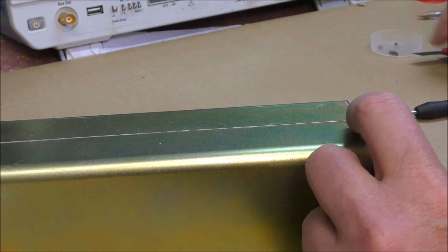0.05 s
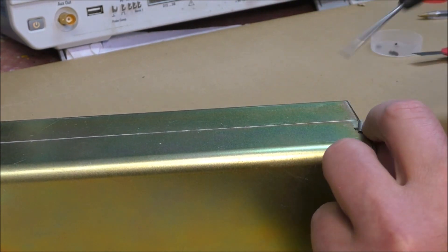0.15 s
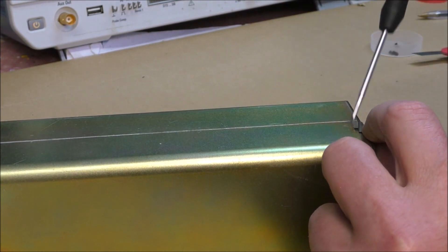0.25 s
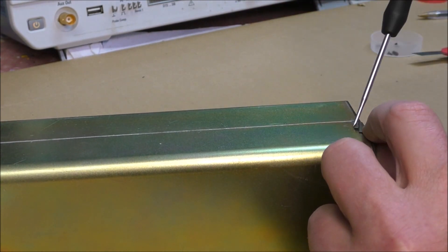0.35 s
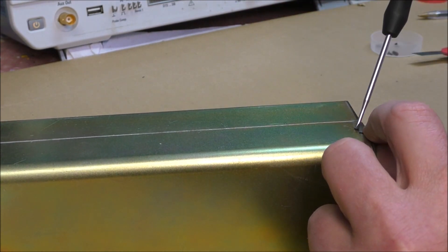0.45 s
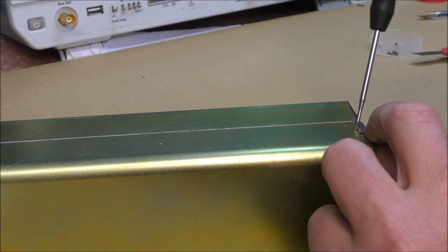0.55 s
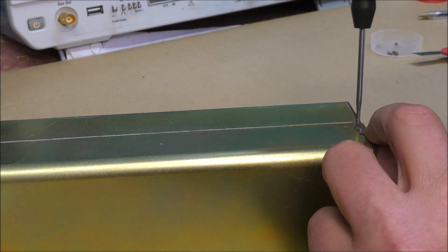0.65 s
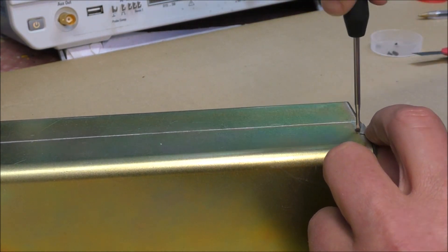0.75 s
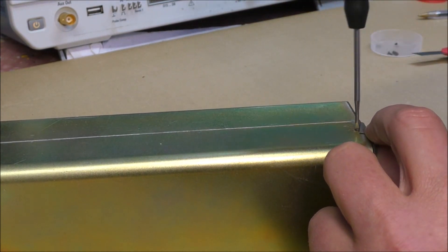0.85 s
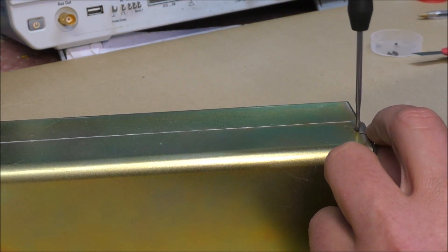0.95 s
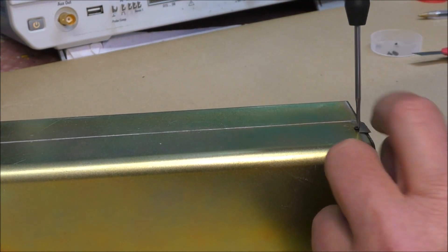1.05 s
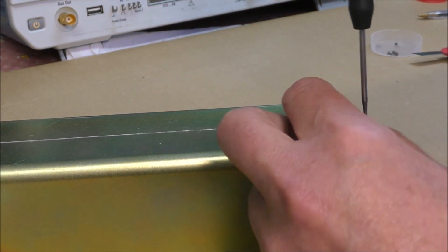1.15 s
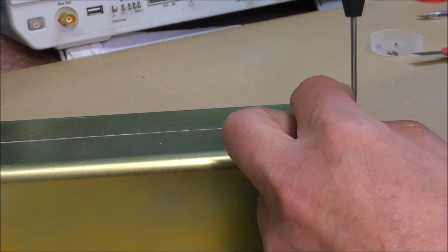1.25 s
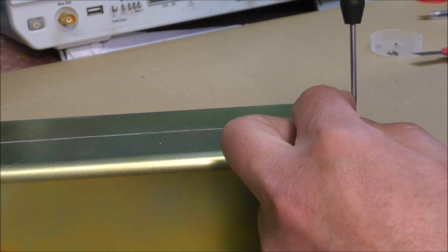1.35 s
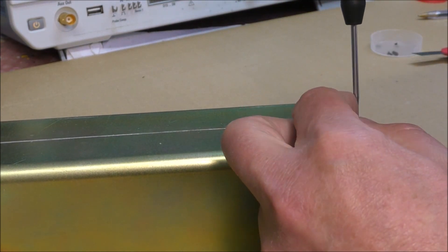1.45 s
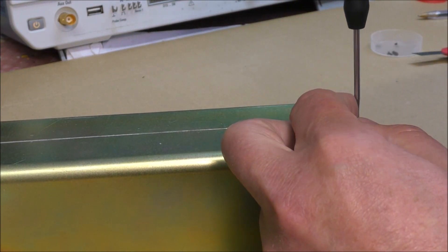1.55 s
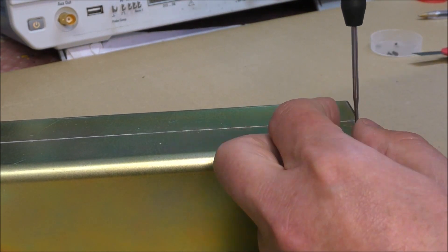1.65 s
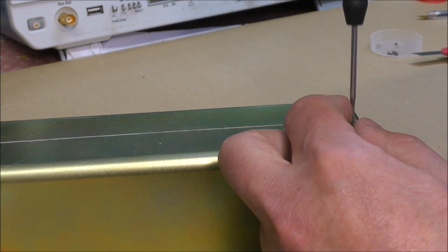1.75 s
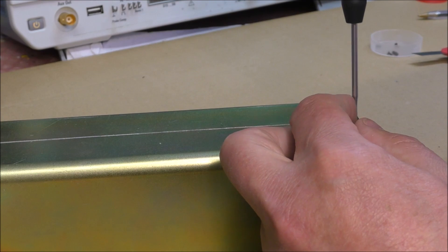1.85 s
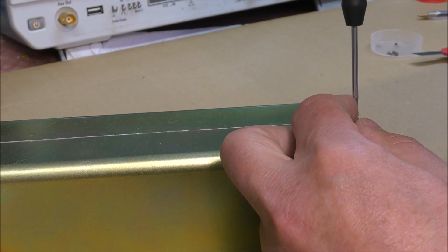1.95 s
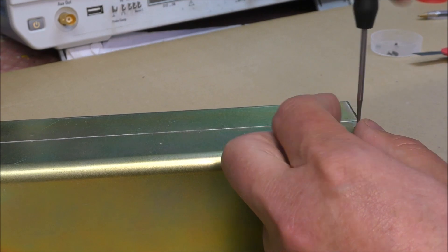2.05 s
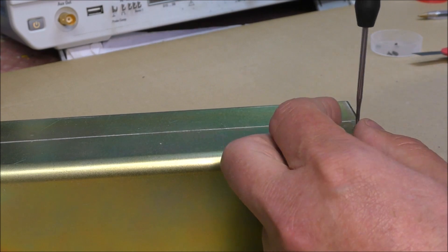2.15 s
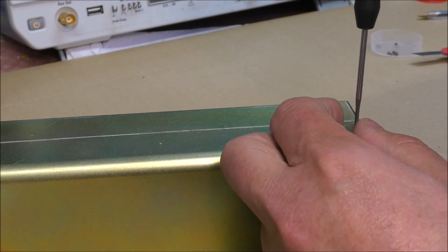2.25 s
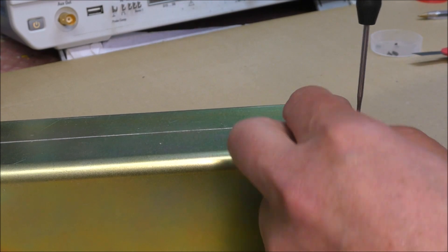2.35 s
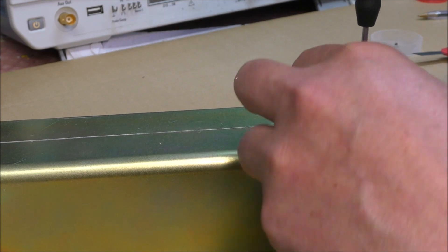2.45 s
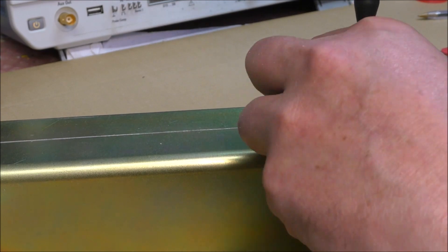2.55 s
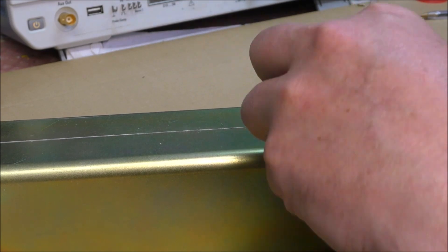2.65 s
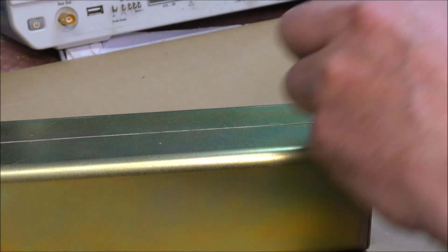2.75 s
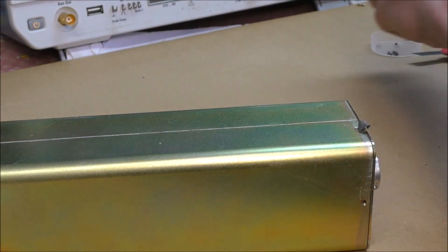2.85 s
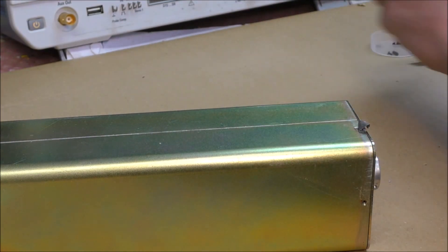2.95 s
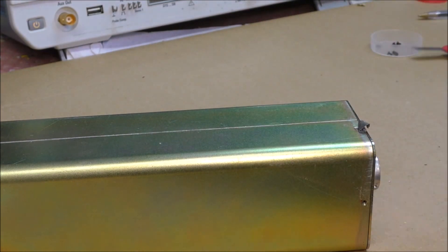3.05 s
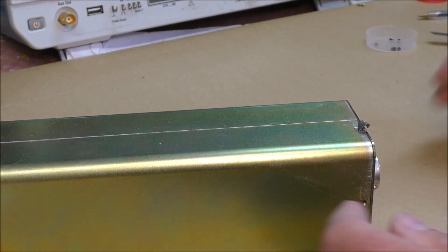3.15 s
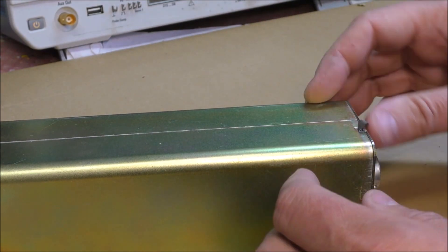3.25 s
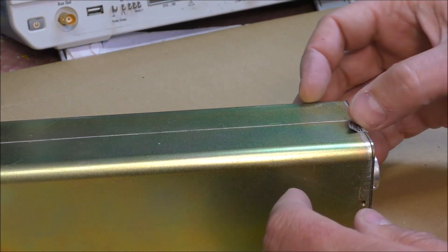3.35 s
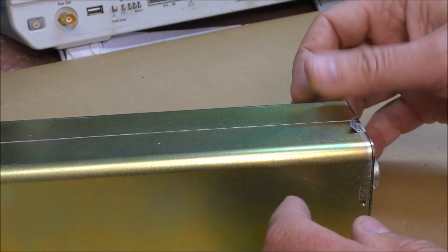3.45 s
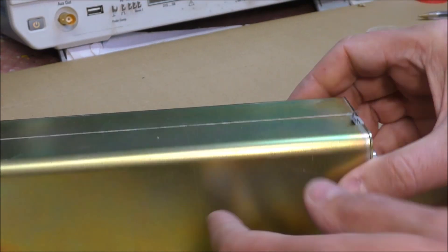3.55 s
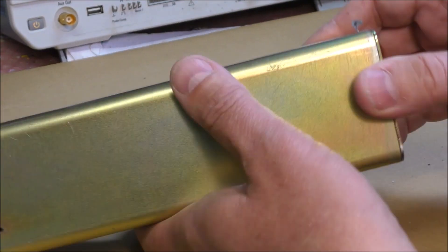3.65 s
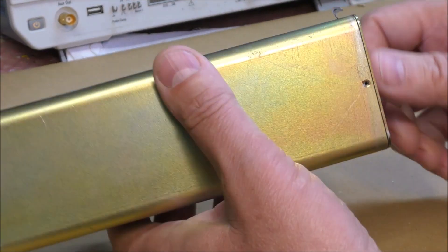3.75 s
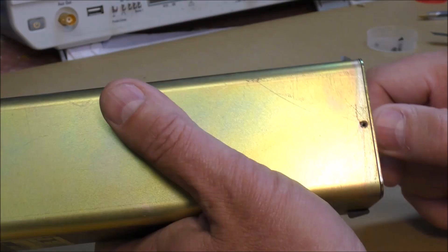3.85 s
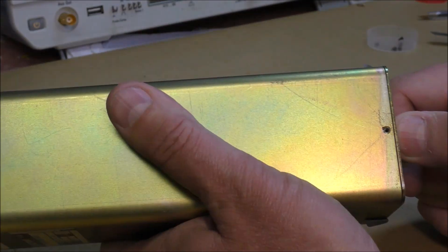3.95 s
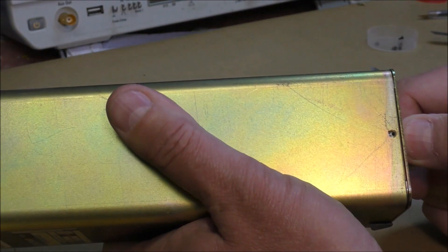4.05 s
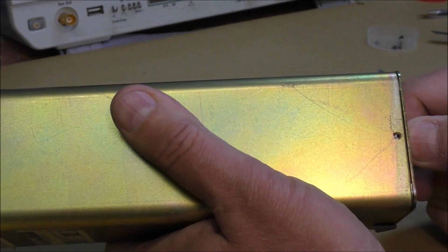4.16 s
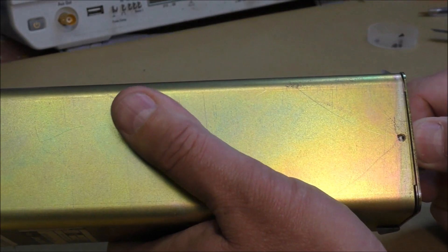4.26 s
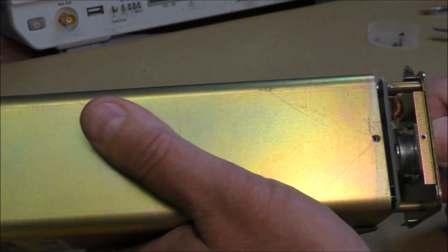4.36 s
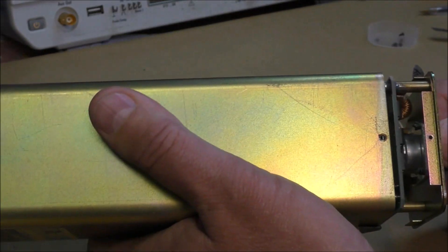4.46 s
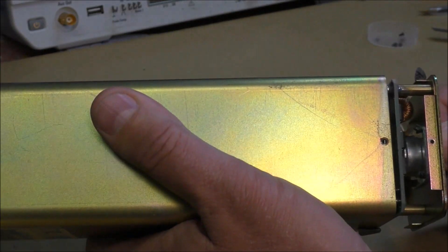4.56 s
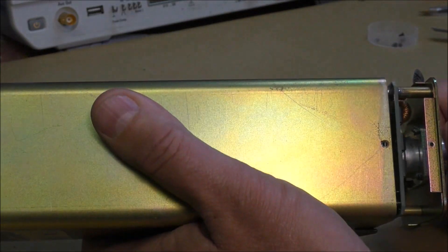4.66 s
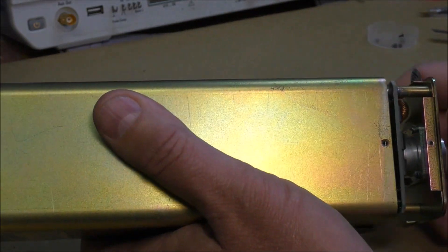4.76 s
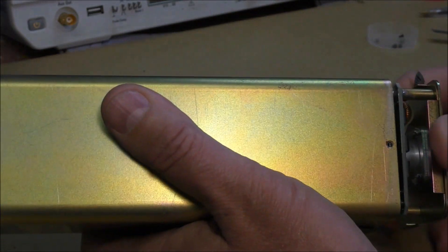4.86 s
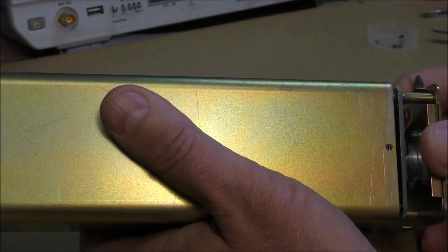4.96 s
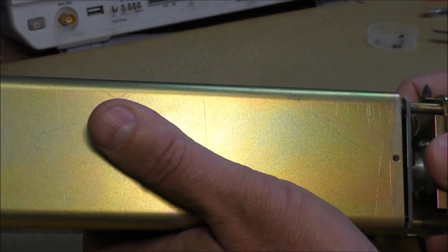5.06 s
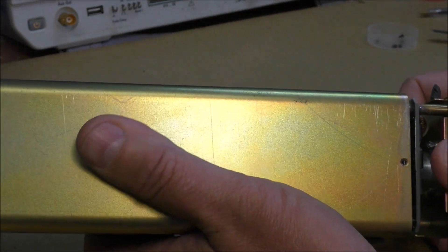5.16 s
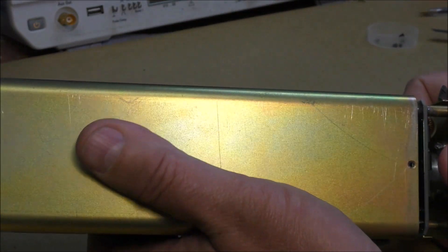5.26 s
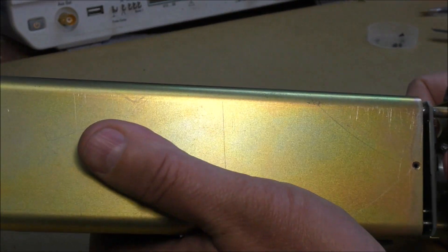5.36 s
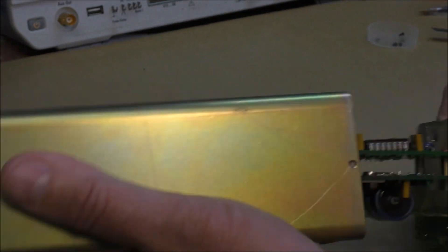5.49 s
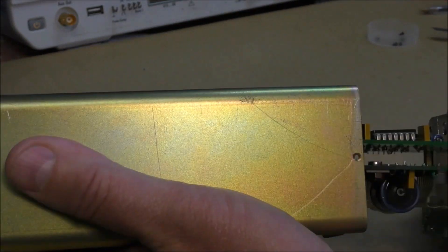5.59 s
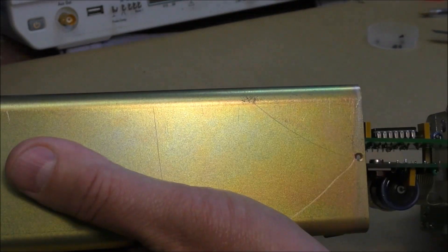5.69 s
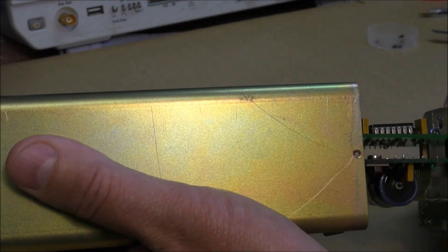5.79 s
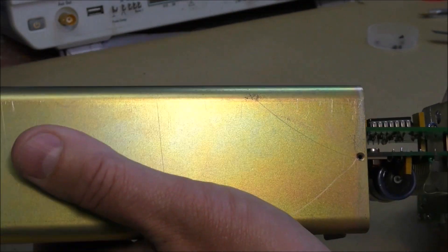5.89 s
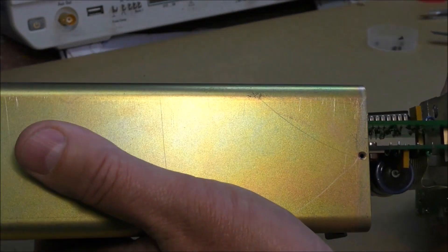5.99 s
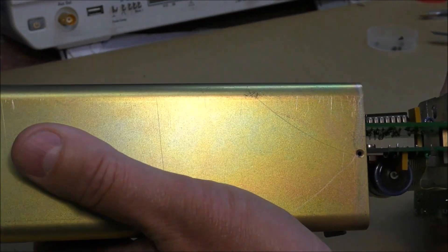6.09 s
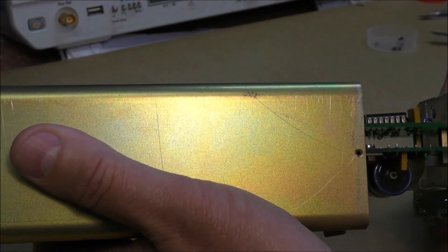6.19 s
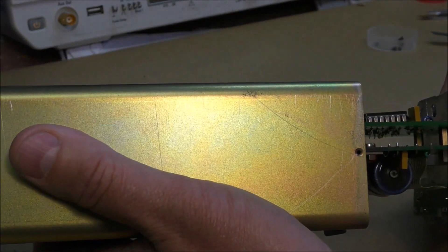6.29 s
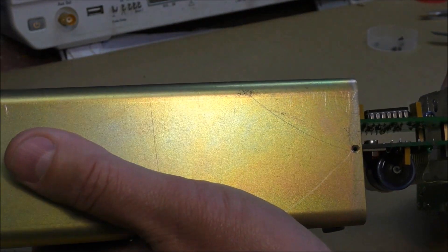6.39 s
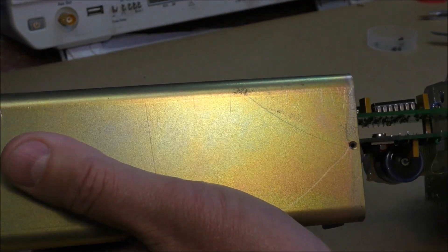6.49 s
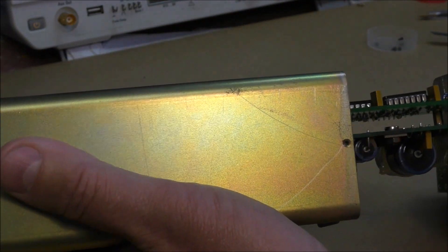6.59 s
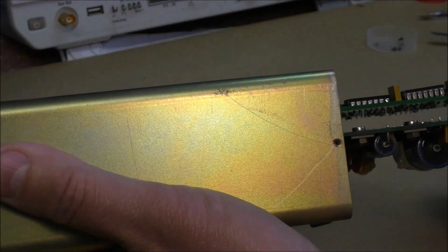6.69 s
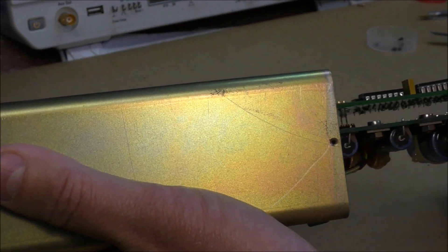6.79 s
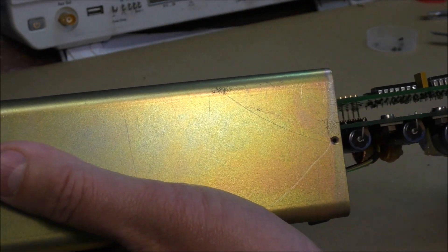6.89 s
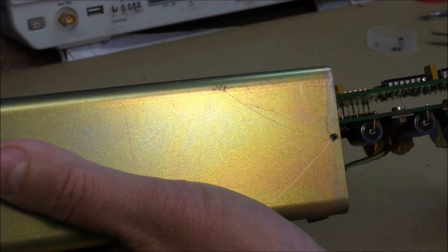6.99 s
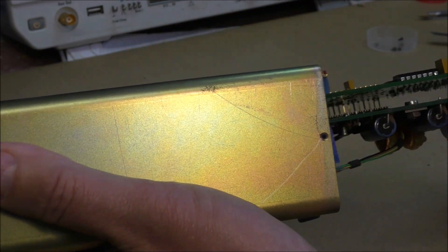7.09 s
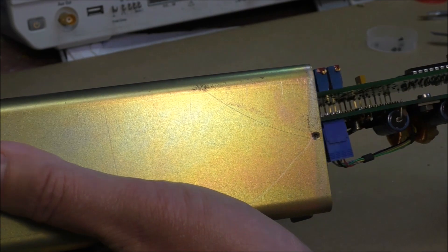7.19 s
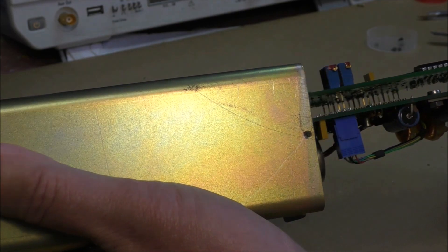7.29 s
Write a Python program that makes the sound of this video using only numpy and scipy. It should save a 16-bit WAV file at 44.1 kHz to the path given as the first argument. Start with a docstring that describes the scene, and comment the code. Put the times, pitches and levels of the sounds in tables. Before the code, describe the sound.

A small screwdriver ticks and rasps lightly at a screw in a sheet-metal case, and fingers brush the steel. Then the chassis knocks free and is dragged out in two loud, ringing scrapes, the first with a brief squeal. It rattles hollowly in the emptying sleeve, and a circuit board slides softly along the wall. Heard close up in a small room with faint background noise.

```python
"""Opening a sheet-metal instrument case.

A small screwdriver ticks and rasps at a screw, and fingers brush the case. The chassis knocks free and
is dragged out in two loud scrapes, friction clicks ringing the modes of the steel sleeve. It rattles in
the emptying sleeve, then its circuit board slides along the wall. Heard close up in a small room."""
import sys
import numpy as np
from scipy import signal
from scipy.fft import rfft, irfft, next_fast_len
from scipy.io import wavfile
from scipy.ndimage import uniform_filter1d

SR = 44100
rng = np.random.default_rng(int(sys.argv[2]) if len(sys.argv) > 2 else 0)


def output_pcm(signal):
    """Save a mono or channel-first signal as 16-bit PCM at the path in sys.argv[1].

    Samples are clipped to [-1, 1] before scaling.
    """
    pcm = np.clip(np.atleast_2d(signal).T, -1, 1) * 32767
    wavfile.write(sys.argv[1], SR, np.round(pcm).astype(np.int16))


N = 323314
RING_T = np.arange(SR // 2) / SR
ROOM_CHANGE_S = 4.01
FREE_S, EMPTY_S, LOOSE_S = 4.55, 5.45, 5.8  # chassis free, sleeve hollow, chassis rattling


def amp(db):
    """Decibels to gain."""
    return 10 ** (np.asarray(db) / 20)


def rms(x):
    """Root mean square."""
    return np.sqrt(np.mean(x ** 2)) + 1e-12


def decay(t60_s):
    """Exponential decay of a ring."""
    return np.exp(-np.log(1000) * RING_T / t60_s)


def add(out, start_s, x):
    """Mix x into out from start_s on."""
    i = max(int(start_s * SR), 0)
    out[:, i:i + x.shape[1]] += x[:, :max(N - i, 0)]


def band(x, lo_hz, hi_hz):
    """Band-pass whose neighbours sum flat."""
    count = x.shape[-1]
    hz = np.fft.rfftfreq(2 * count, 1 / SR) + 1
    return irfft(rfft(x, 2 * count) / (1 + (lo_hz / hz) ** 10) / (1 + (hz / hi_hz) ** 10))[..., :count]


def colour(x, eq):
    """Minimum-phase filter through (Hz, dB) points."""
    half = next_fast_len(x.shape[-1])
    hz, db = np.transpose(eq)
    curve_db = np.interp(np.log(np.linspace(1, SR / 2, half + 1)), np.log(hz), db)
    cepstrum = irfft(curve_db * np.log(10) / 20)
    cepstrum[1:half] *= 2
    response = np.exp(rfft(cepstrum[:half], 2 * half))
    return irfft(rfft(x, 2 * half) * response)[..., :x.shape[-1]]


def stereo_noise(count, side_db=-8.5):
    """White noise; side_db sets its width."""
    mid, side = rng.standard_normal((2, count))
    return mid + amp(side_db) * side * np.array([[1], [-1]])


def wobble(count, lo_hz, hi_hz):
    """Band-limited random motion, unit RMS."""
    motion = band(rng.standard_normal(count), lo_hz, hi_hz)
    return motion / rms(motion)


def grit(count, spread_db):
    """Surface peaks catch and let go: dense clicks of uneven size."""
    noise = rng.standard_normal(count)
    sizes = np.repeat(rng.standard_normal(count // 32 + 1), 32)[:count]
    clicks = noise * amp(spread_db * sizes)
    return clicks / rms(clicks)


def swell(start_s, peak_s, end_s, depth_db, curve, edge_s=0.0032):
    """Times and effort in dB of a hand stroke that builds and eases off."""
    t = np.arange(start_s, end_s, 1 / SR)
    off_peak = np.abs(np.interp(t, [start_s, peak_s, end_s], [-1, 0, 1]))
    grip = np.clip(np.minimum(t - start_s, end_s - t) / edge_s, 1e-3, 1)
    return t, -depth_db * off_peak ** curve + 20 * np.log10(grip)


def tilted(bands_hz, balance_db, tilt_db_oct):
    """Band levels in dB: harder contacts lean to the treble."""
    octaves = np.log2(np.prod(bands_hz, axis=1)) / 2
    return np.array(balance_db) + tilt_db_oct * (octaves - octaves[-2])


def strike(ring, bands_hz, bands_db):
    """A contact feeds the ring with its own peak level (over 4 ms) in each band."""
    peak_power = [uniform_filter1d(band(ring.mean(0), *edges) ** 2, 176).max() for edges in bands_hz]
    centres_hz = np.sqrt(np.prod(bands_hz, axis=1))
    return colour(ring, np.column_stack([centres_hz, bands_db - 10 * np.log10(peak_power)]))


# Room noise before and after ROOM_CHANGE_S. Each row: frequency in Hz, gain in dB.
EARLY_ROOM_EQ = [(18, -71), (30, -28.5), (165, -22), (199, -12.5), (374, -18), (540, -2), (600, -13),
                 (666, -7), (988, -10.5), (1070, -13), (1540, -10.5), (2540, -26.5), (2980, -22),
                 (11400, -26.5), (16000, -36)]
LATE_ROOM_EQ = [(18, -34), (30, -0.5), (384, 1.5), (473, -2), (584, -15), (937, -5.5), (1280, -12),
                (1500, -2), (2830, -10), (3770, -11), (4530, -23), (9710, -17), (16000, -18.5)]


def room_air(early_db=-55.5, late_db=-55):
    """Steady room noise that switches abruptly to a bassier tone at about 4 s."""
    blend = np.clip((np.arange(N) / SR - ROOM_CHANGE_S) / 0.021, 0, 1)
    early, late = (colour(stereo_noise(N, -7.5), eq) for eq in (EARLY_ROOM_EQ, LATE_ROOM_EQ))
    return (1 - blend) * early / rms(early[0]) * amp(early_db) + blend * late / rms(late[0]) * amp(late_db)


# Each row: time in seconds, relative level in dB.
HISS_LEVELS = [(1.2, -77), (1.3, -67), (1.68, -65), (1.74, -84), (2.4, -75), (2.55, -64), (2.9, -65.5),
               (3.35, -60.5), (3.42, -78)]


def thin_hiss(upper_db=-1):
    """Two narrow bands of hiss come and go while the screw is worked."""
    times_s, db = np.transpose(HISS_LEVELS)
    noise = stereo_noise(N)
    upper = band(band(noise, 10800, 12200), 10800, 12200)
    hiss = band(noise, 5900, 6100) + amp(upper_db) * upper
    return hiss / rms(hiss) * amp(np.interp(np.arange(N) / SR, times_s, db))


# Each row: start, peak and end in seconds, relative level in dB.
FINGER_STROKES = [(0.209, 0.214, .26, -40), (2.922, 3.023, 3.03, -51.5), (3.157, 3.188, 3.245, -35.5),
                  (3.65, 3.732, 3.83, -40.5), (3.824, 3.845, 3.86, -49), (3.893, 3.982, 4.0, -48.5)]
# Each row: frequency in Hz, gain in dB.
SKIN_EQ = [(710, -68), (1200, -2), (1570, -17), (2650, -11), (4170, -1), (5970, -1), (7410, -0.5),
           (11800, -1.5), (16000, -6)]


def finger_brushes(gain_db=-1):
    """Dry skin over plated steel: a fine, crackly hiss."""
    out = np.zeros((2, N))
    for start_s, peak_s, end_s, db in FINGER_STROKES:
        t, effort_db = swell(start_s, peak_s, end_s, depth_db=15.5, curve=1.5)
        hiss = colour(grit(len(t), spread_db=5.5) + stereo_noise(len(t), 0) * amp(-4.5), SKIN_EQ)
        add(out, start_s, hiss / rms(hiss) * amp(db + effort_db + gain_db))
    return out


def bench_bump(start_s=0.164, db=-29, t60_s=0.006):
    """The hardest tick jolts the bench: one short, dull push."""
    out = np.zeros((2, N))
    push = colour(decay(t60_s)[None], [(20, -4.5), (60, -5.5), (600, -1), (2500, -8)])
    add(out, start_s, push / np.abs(push).max() * amp(db))
    return out


# Tip on steel. Each row: frequency in Hz, gain in dB.
TIP_EQ = [(100, -28), (600, -8.5), (1500, -0.5), (2400, -6.5), (3200, -1), (4200, 10.5), (6000, 12.5),
          (7200, 2), (10000, 2), (16000, -4.5)]


def tip_ring(crack_t60_s, steel_db, steel_t60_s, room_db, room_t60_s):
    """A small, hard contact: a crack, a brief ring of steel, the room's tail."""
    tail = amp(steel_db) * decay(steel_t60_s) + amp(room_db) * decay(room_t60_s)
    crack = stereo_noise(len(RING_T), -20) * decay(crack_t60_s)
    return colour(crack + tail * stereo_noise(len(RING_T), -6), TIP_EQ)


# Each row: low and high edge in Hz.
TIP_BANDS_HZ = [(1000, 3200), (3500, 7000), (7500, 16000)]
# Each row: start in seconds, relative level in dB, tilt in dB per octave.
TIP_TICKS = [(0.1204, -48.5, 6.5), (0.1517, -26.5, -5.5), (0.1602, -41, -9), (0.1642, -21.5, 0),
             (0.1716, -32, 1), (0.2125, -47.5, -9), (0.3945, -42, 0), (0.6553, -44, -6),
             (0.7849, -33.5, -2), (1.0675, -50, 2), (1.1894, -48.5, 2), (1.856, -54, 9), (1.88, -44.5, -10),
             (2.0645, -49, 0), (3.0007, -44.5, -6.5), (3.0357, -38, 12.5), (3.0633, -38, -9),
             (3.067, -27, -2.5), (3.1934, -39.5, 1), (3.2204, -35.5, -1.5), (3.4252, -59.5, 7),
             (3.702, -36, 8), (3.708, -30, 4), (3.8443, -44.5, 6)]


def screwdriver_ticks(balance_db=(-10, 0, -0.53)):
    """The screwdriver tip and the screw touch metal."""
    out = np.zeros((2, N))
    for start_s, db, tilt in TIP_TICKS:
        ring = tip_ring(crack_t60_s=0.0036, steel_db=-17.5, steel_t60_s=0.044, room_db=-26, room_t60_s=0.11)
        add(out, start_s, strike(ring, TIP_BANDS_HZ, db + tilted(TIP_BANDS_HZ, balance_db, tilt)))
    return out


# Each row: release in seconds, relative level in dB, tilt in dB per octave.
SCREW_TWISTS = [(.894, -55.5, -3), (0.936, -54, 1), (.997, -59, 3), (1.015, -52, 0), (1.088, -51, 5),
                (1.153, -44.5, -1.5), (1.21, -56, 12.5), (1.254, -60.5, 3), (2.313, -52.5, 2),
                (2.382, -53, 8.5), (2.45, -50.5, 1.5), (2.515, -52.5, -2), (2.576, -51, 4.5),
                (2.639, -49.5, -1), (2.698, -43, -2.5), (2.753, -46.5, 2)]


def screw_rasps(balance_db=(-8.5, 0, 3.9), lead_s=0.0071, lead_db=-10, spread_db=4):
    """Each twist grinds up briefly, then the thread lets go in a spray of tiny catches."""
    out = np.zeros((2, N))
    count = int(lead_s * SR)
    for release_s, db, tilt in SCREW_TWISTS:
        ring = tip_ring(crack_t60_s=0.0059, steel_db=-3, steel_t60_s=0.041, room_db=-29.5, room_t60_s=0.54)
        lead = colour(stereo_noise(count) * np.linspace(0, amp(lead_db), count), TIP_EQ)
        rasp = np.hstack([lead, ring])
        catches = amp(spread_db * wobble(rasp.shape[1], 50, 810))
        bands_db = db + tilted(TIP_BANDS_HZ, balance_db, tilt)
        add(out, release_s - lead_s, strike(rasp * catches, TIP_BANDS_HZ, bands_db))
    return out


# Each row: frequency in Hz, T60 in seconds, weight in dB with the sleeve full, then nearly empty.
SLEEVE_MODES = [ (106.5, 0.096, -30, -18), (249.7, 0.097, -2, -6), (323, 0.081, -4, -7),
                (378.4, 0.13, -0.5, -7.5), (748, 0.049, -16.5, -0.5), (820.5, 0.22, -12, 7),
                (944, 0.18, -28, 6.5), (972, 0.17, -17.5, 8), (1077, 0.091, -9.5, 8),
                (1177, 0.059, -2, -16), (1232, 0.22, -5.5, 5), (1422, 0.15, -15, -9.5),
                (1490, 0.094, -7, 0.5), (1582, 0.046, -1, -34.5), (1782, 0.41, -11, -2), (1869, 0.1, -5, 8),
                (2093, 0.073, -10.5, 5.5), (2523, 0.14, -6.5, 5.5), (2630, 0.31, -16, -5),
                (2680, .1, -29, 3), (3230, 0.081, -20, -14), (3400, 0.069, -35, -34),
                (3570, 0.21, -9, -5.5), (3790, 0.06, -3, -43), (3970, 0.13, -26, -1),
                (4060, 0.35, -13, -23), (4480, 0.18, -25, -3), (5300, .1, -18, -30), (6210, 0.22, -5, -5),
                (8250, 0.27, -24, -25)]


def sleeve_ring(start_s, eq, modes_db, sheet_t60_s, treble_t60_s, room_db=-25, room_t60_s=0.65):
    """The sleeve's answer to a tap: distinct modes over a crowd of short ones, and the room's tail."""
    modes = np.zeros((2, len(RING_T)))
    for hz, t60_s, full_db, empty_db in SLEEVE_MODES:
        db = empty_db if start_s > EMPTY_S else full_db
        # each mode radiates its own way, so left and right differ in phase
        phase = np.pi * rng.integers(2) + 0.4 * rng.standard_normal() * np.array([[1], [-1]])
        modes += amp(db) / np.sqrt(t60_s) * decay(t60_s) * np.sin(2 * np.pi * hz * RING_T + phase)
    noise = stereo_noise(len(RING_T))
    treble = band(noise, 4000, SR)
    room = noise * amp(room_db) * decay(room_t60_s)
    crowd = colour((noise - treble) * decay(sheet_t60_s) + treble * decay(treble_t60_s) + room, eq)
    return crowd / rms(crowd) + amp(modes_db) * modes / rms(modes)


# Each row: low and high edge in Hz.
FRICTION_BANDS_HZ = [(25, 500), (500, 1500), (1500, 4500), (4500, 17000)]


def friction(t, effort_db, bands_db, growth, eq, spread_db, spot_s=0.14, **ring_settings):
    """Friction clicks ring the sleeve; each band rises by its growth in dB per dB of effort."""
    out = np.zeros((2, N))
    clicks = grit(len(t), spread_db)
    # the contact travels over spots that each ring a little differently
    spots_s = np.linspace(t[0], t[-1], 2 + int((t[-1] - t[0]) / spot_s))
    for share in np.eye(len(spots_s)):
        weight = np.sqrt(np.interp(t, spots_s, share))
        touching = weight > 0
        ring = sleeve_ring(t[0], eq, **ring_settings)
        for edges, db, slope in zip(FRICTION_BANDS_HZ, bands_db, growth):
            pressure = weight[touching] * amp(db + slope * effort_db[touching])
            sound = signal.fftconvolve(band(clicks[touching], *edges)[None] * pressure, ring)
            # energy radiated equals energy put in
            gain = np.sqrt(np.sum(pressure ** 2) / np.sum(sound.mean(0) ** 2))
            add(out, t[touching][0], sound * gain)
    return out


# Each row: frequency in Hz, gain in dB.
WALL_EQ = [(18, -49), (30, -31), (189, -5.5), (449, -14), (616, -14.5), (844, -14.5), (937, -1),
           (1010, -13), (1430, -8), (1630, -21.5), (1910, -15.5), (4420, -16), (7470, -18.5),
           (13000, -17.5), (16000, -28)]


def wall_slide(t, effort_db, bands_db):
    """Light, smooth rubbing along the sleeve wall; faster is brighter."""
    return friction(t, effort_db, bands_db, growth=(0.6, 0.7, 1, 1.3), eq=WALL_EQ, spread_db=0,
                    modes_db=-11, sheet_t60_s=0.048, treble_t60_s=0.046)


# Each row: start, peak and end in seconds, relative level in dB, tilt in dB per octave.
CHASSIS_NUDGES = [(4.011, 4.017, 4.11, -56.5, -0.5), (4.64, 4.788, 4.88, -50.5, 2.5),
                  (4.884, 4.914, 5.05, -49.5, 5.5), (5.052, 5.087, 5.18, -52.5, -3),
                  (5.198, 5.245, 5.32, -49, -2.5)]


def chassis_nudges(balance_db=(-24, -7, 0, -3)):
    """The chassis is eased to and fro in short swells."""
    out = np.zeros((2, N))
    for start_s, peak_s, end_s, db, tilt in CHASSIS_NUDGES:
        t, effort_db = swell(start_s, peak_s, end_s, depth_db=14, curve=1.26)
        out += wall_slide(t, effort_db, db + tilted(FRICTION_BANDS_HZ, balance_db, tilt))
    return out


# Each row: time in seconds, relative level in dB.
BOARD_LEVELS = [(6.39, -57), (6.436, -48.5), (6.504, -44), (6.588, -51), (6.674, -38), (6.742, -39),
                (6.75, -41.5), (7.02, -43.5), (7.04, -46), (7.148, -37.5), (7.258, -43), (7.33, -43.5)]


def board_glide(nominal_db=-42, balance_db=(-16, 1, 0, -5.5)):
    """The circuit board is drawn along the wall in one long movement."""
    times_s, db = np.transpose(BOARD_LEVELS)
    t = np.arange(times_s[0], times_s[-1], 1 / SR)
    return wall_slide(t, np.interp(t, times_s, db) - nominal_db, nominal_db + np.array(balance_db))


# Each row: start and rise in seconds, frequency in Hz, relative level in dB, T60 in seconds.
HIGH_MODES = [ (.395, .0006, 5800, -34, .035), (.785, .0006, 4750, -35, .04),
              (2.383, .003, 13500, -29, .025), (4.366, .0015, 3200, -14, .04),
              (4.438, .008, 7520, -23, .08), (4.448, .012, 8335, -25, .24), (4.454, .008, 6210, -23, .07),
              (5.592, .025, 8905, -20, .22), (5.750, .012, 8920, -37, .35), (5.752, .012, 3920, -30, .08),
              (5.775, .008, 6210, -28, .1), (6.012, .018, 8930, -48, .12)]


def singing_modes(gain_db=-2, beat_hz=38, partner_db=-8, flutter_db=3.5):
    """A tap or sliding edge drives one mode; it dies away unevenly, beating with a neighbour."""
    out = np.zeros((2, N))
    for start_s, rise_s, hz, db, t60_s in HIGH_MODES:
        attack = np.minimum(RING_T / rise_s, 1)
        release = np.exp(-np.log(1000) * np.maximum(RING_T - rise_s, 0) / t60_s)
        phase = 2 * np.pi * hz * RING_T
        partner = amp(partner_db) * np.sin(phase + 2 * np.pi * (beat_hz * RING_T + rng.random((2, 1))))
        level = amp(db + gain_db + flutter_db * wobble(len(RING_T), 28, 150))
        add(out, start_s, (np.sin(phase) + partner) * attack * release * level)
    return out


# Each row: time in seconds, slip rate in Hz, relative level in dB.
SQUEAL_PATH = [(4.387, 1552, -11), (4.416, 1775, -21.5), (4.432, 1823, -26), (4.458, 1840, -15),
               (4.471, 1780, -24)]


def edge_squeal(gain_db=-2, jitter=0.013, octave_db=-6, flutter_db=3):
    """In the first pull an edge's slips fall into step: an unsteady rising tone with its octave."""
    out = np.zeros((2, N))
    times_s, hz, db = np.transpose(SQUEAL_PATH)
    t = np.arange(times_s[0], times_s[-1], 1 / SR)
    slip_hz = np.interp(t, times_s, hz) * (1 + jitter * wobble(len(t), 30, 180))
    phase = 2 * np.pi * np.cumsum(slip_hz) / SR + np.array([[0.3], [-0.3]])
    flutter = amp(flutter_db * wobble(len(t), 30, 180))
    tone = (np.sin(phase) + amp(octave_db) * np.sin(2 * phase)) * flutter
    envelope = amp(np.interp(t, times_s, db) + gain_db) * signal.windows.tukey(len(t), 0.1)
    add(out, times_s[0], tone / rms(tone) * envelope)
    return out


# Weak sheet modes of the full, emptying and rattling sleeve. Each row: frequency in Hz, gain in dB.
FULL_EQ = [(18, -50), (30, -20), (374, -3.5), (600, -19), (801, -10), (1430, -3), (1810, -2.5), (2230, -9),
           (3670, -2.5), (4420, -8), (6210, -8), (6900, -9), (8300, -7), (9220, -8.5), (16000, -18.5)]
EMPTY_EQ = [(18, -38), (30, -6), (64, -11.5), (112, -2), (336, -5.5), (499, -7), (632, -3.5), (684, -11),
            (962, -4), (1320, -4.5), (3490, -7.5), (6900, -18), (9220, -13.5), (14400, -19.5), (16000, -26)]
RATTLE_EQ = [(18, -62), (30, -36), (194, -0.5), (473, -43), (616, -6.5), (866, -16), (962, -1.5),
             (1430, -15.5), (1860, -3.5), (2290, -21.5), (2830, -12.5), (3310, -28), (6210, -23.5),
             (6900, -33), (16000, -39)]
# Each row: low and high edge in Hz.
KNOCK_BANDS_HZ = [(80, 500), (600, 1500), (1600, 4500), (5000, 16000)]
# Each row: start in seconds, relative level in dB, tilt in dB per octave, thump in dB.
CHASSIS_KNOCKS = [(4.093, -48.5, 3.5, -24), (4.1266, -21, -.5, -7), (4.366, -17, -1.5, -23),
                  (4.538, -27, -4, -33), (4.5587, -19, -.5, -29), (4.599, -26, 0, -28),
                  (5.353, -34.5, 1, 1), (5.4872, -20, 2.5, -8), (5.5154, -15, 0.5, -3.5),
                  (5.531, -15, 4.5, -19), (5.557, -12, 3, -0.5), (5.57, -12, 1, -6.5),
                  (5.6125, -20.5, 4.5, -4), (5.6454, -14, -1, -4.5), (5.73, -15.5, -1, -7.5),
                  (5.7719, -19, -4.5, -19.5), (5.8082, -26, 1.5, -27), (5.8803, -28, 1, -21),
                  (5.9158, -36, -2.5, -16), (5.9742, -31.5, 2.5, -18), (6.0114, -31, -0.5, -20.5),
                  (6.068, -30.5, 2, -30), (6.1047, -42, 1, -14), (6.1517, -52, -10.5, -18),
                  (6.1997, -38, -2, -23), (6.2283, -37.5, 0.5, -28), (6.283, -55, -9.5, -15),
                  (6.3653, -43, -1, -20)]


def chassis_knocks(wedged_db=(1.5, -10.5, -1.5, -17), sliding_db=(0.5, -1.5, 0, -8),
                   loose_db=(0, 7.5, -1, -16.5)):
    """The chassis jumps free and catches; once loose it rattles hollowly between the walls."""
    out = np.zeros((2, N))
    for start_s, db, tilt, thump_db in CHASSIS_KNOCKS:
        if start_s > LOOSE_S:
            ring = sleeve_ring(start_s, RATTLE_EQ, modes_db=-1, sheet_t60_s=0.073, treble_t60_s=0.1,
                               room_db=-24)
            ring *= 1 + 0.63 * decay(0.02)  # the struck spot sounds first and loudest
            balance_db = loose_db
        else:
            eq = EMPTY_EQ if start_s > EMPTY_S else FULL_EQ
            ring = sleeve_ring(start_s, eq, modes_db=-4, sheet_t60_s=0.11, treble_t60_s=0.092)
            balance_db = sliding_db if start_s > FREE_S else wedged_db
        bands_db = tilted(KNOCK_BANDS_HZ, balance_db, tilt)
        bands_db[0] = balance_db[0] + thump_db  # bass follows the blow's weight, not its hardness
        add(out, start_s, strike(ring, KNOCK_BANDS_HZ, db + bands_db))
    return out


# Each row: start, peak and end in seconds, relative level in dB.
PULLS = [(4.38, 4.448, 4.472, -15.5), (5.469, 5.555, 5.675, -20)]


def scrape(pull, curve, judder_db, balance_db, **friction_settings):
    """Metal dragged over metal, sticking and slipping unevenly."""
    start_s, peak_s, end_s, db = pull
    t, effort_db = swell(start_s, peak_s, end_s, depth_db=10, curve=curve)
    effort_db += judder_db * wobble(len(t), 22, 70)
    return friction(t, effort_db, db + np.array(balance_db), **friction_settings)


def first_scrape():
    """The chassis grinds, then brightens as it jumps a little way out of the full sleeve."""
    return scrape(PULLS[0], curve=1.6, judder_db=1.5, balance_db=(-14, -10, 0, -4),
                  growth=(0.8, 0.5, 0.9, 1.8), spread_db=7,
                  eq=FULL_EQ, modes_db=-8, sheet_t60_s=0.099, treble_t60_s=0.069)


def second_scrape():
    """A longer pull drags the chassis clear; the sleeve sounds hollow."""
    return scrape(PULLS[1], curve=1.1, judder_db=2.2, balance_db=(-11, -3, 0, -1),
                  growth=(0.9, 0.6, 1, 1.1), spread_db=8,
                  eq=EMPTY_EQ, modes_db=-10.5, sheet_t60_s=0.04, treble_t60_s=0.06)


def scene():
    """Screwdriver work, then the chassis is pulled out."""
    unscrewing = screwdriver_ticks() + bench_bump() + screw_rasps() + finger_brushes() + thin_hiss()
    pulling = chassis_knocks() + first_scrape() + second_scrape() + edge_squeal()
    sliding = chassis_nudges() + board_glide()
    pan_db = np.array([[0.25], [-0.25]])
    return (unscrewing + pulling + sliding + singing_modes() + room_air()) * amp(pan_db)


def record(dry, cutoff_hz=15950):
    """Clip at full scale, then low-pass steeply."""
    lowpass = signal.ellip(10, 0.2, 80, cutoff_hz, fs=SR, output="sos")
    return signal.sosfilt(lowpass, np.clip(dry, -1, 1))


dry = scene()
out = record(dry)
output_pcm(out)
```